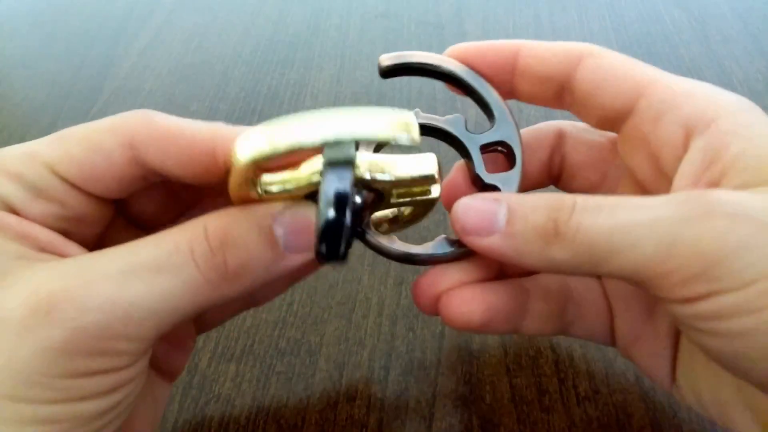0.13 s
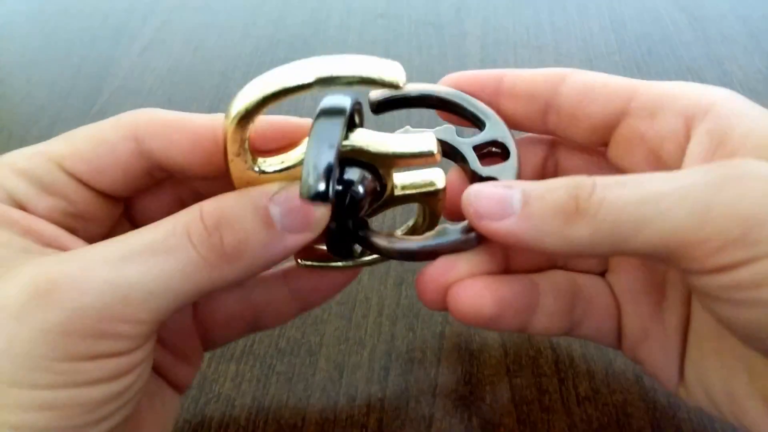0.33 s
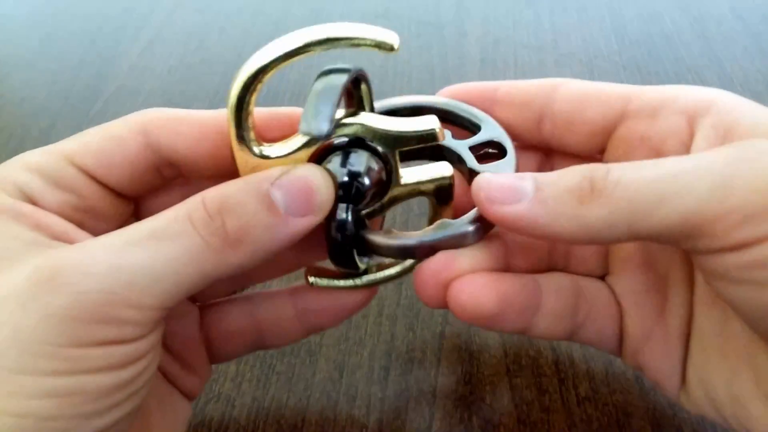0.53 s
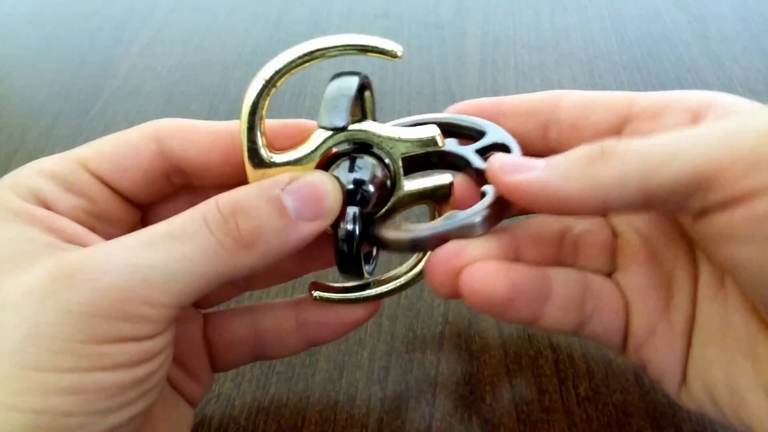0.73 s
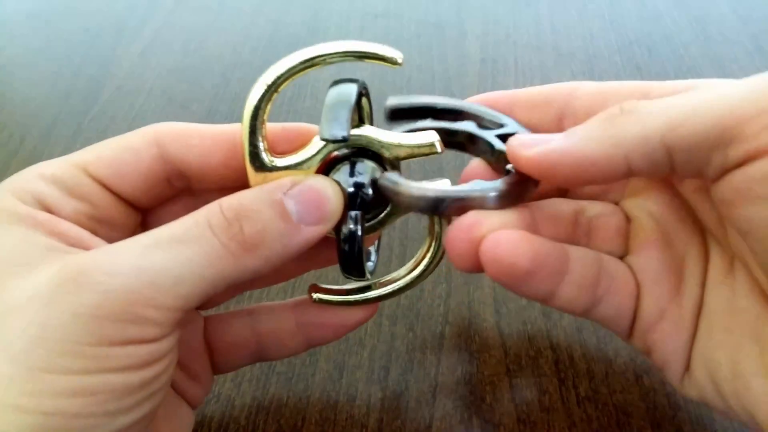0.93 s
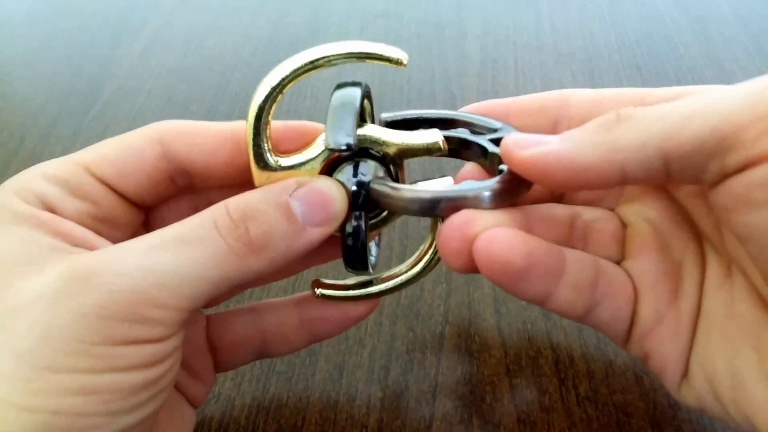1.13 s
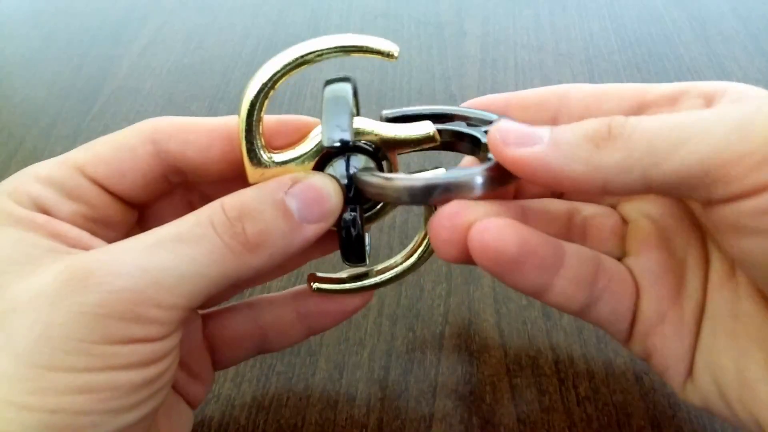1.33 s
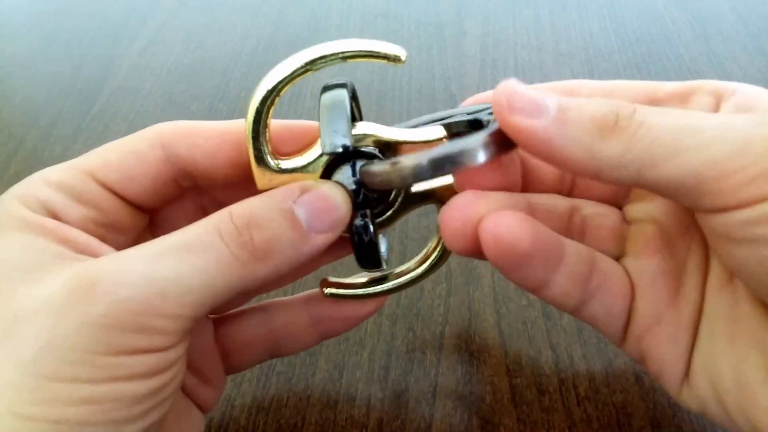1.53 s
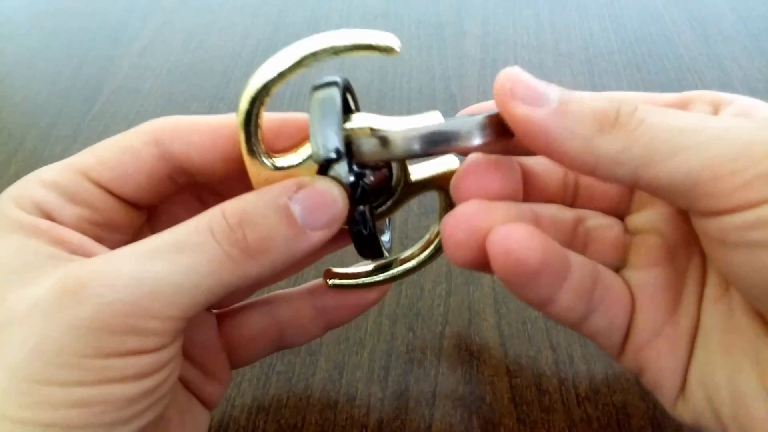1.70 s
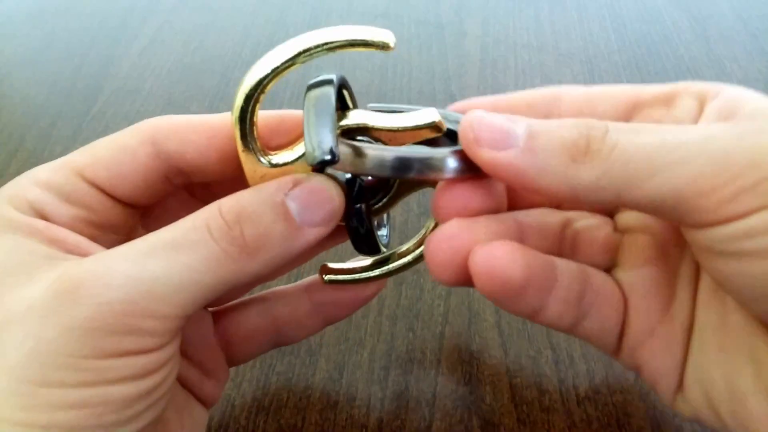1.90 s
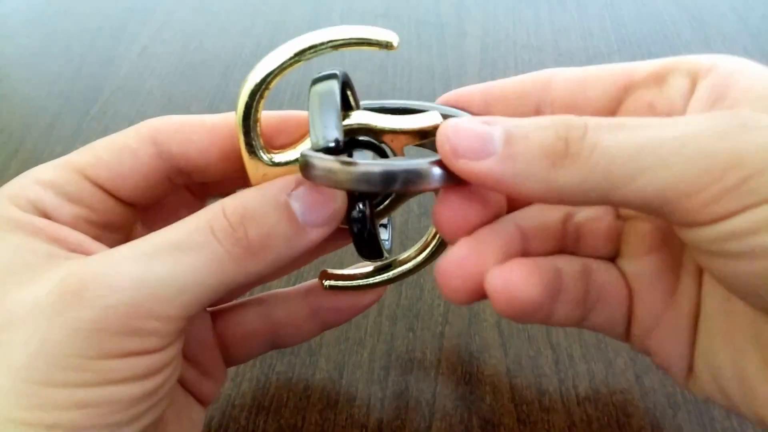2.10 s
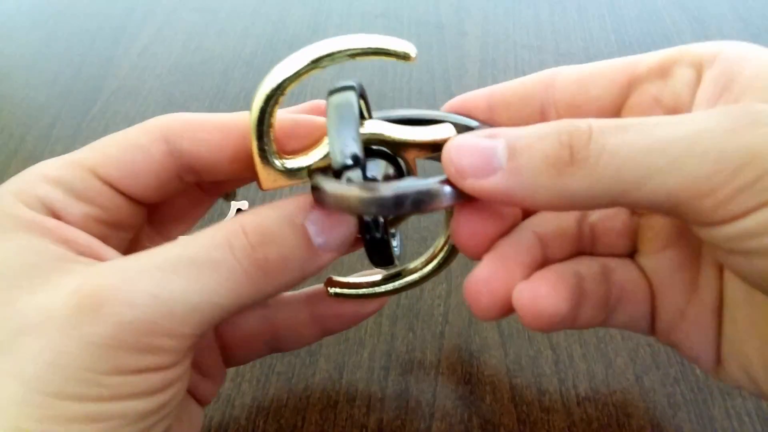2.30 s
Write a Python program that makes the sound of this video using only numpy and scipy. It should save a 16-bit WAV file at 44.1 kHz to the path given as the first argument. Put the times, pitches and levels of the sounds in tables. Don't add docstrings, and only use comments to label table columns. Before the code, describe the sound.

Small heavy metal pieces knock together in three bursts: a dense loud clatter first, then a group of sharp clinks, then a few sparser knocks; short choked rings, fine scraping, close stereo microphones in a quiet room.

```python
import sys
import numpy as np
from scipy import signal
from scipy.fft import rfft, irfft
from scipy.io import wavfile
from scipy.ndimage import uniform_filter1d

SR = 44100
rng = np.random.default_rng(int(sys.argv[2]) if len(sys.argv) > 2 else 0)


def to_wav(sig):
    pcm = np.clip(np.atleast_2d(sig), -1, 1) * 32767
    pcm = np.round(pcm).astype(np.int16)
    wavfile.write(sys.argv[1], SR, pcm.T)


def field_ratio(decibels):
    return 10 ** (np.asarray(decibels, dtype=float) / 20)


N = 103635


def evened(x):
    return x / np.sqrt(np.mean(x ** 2) + 1e-20)


def read(points, hz):
    f, value = np.transpose(points)
    return np.interp(np.log(hz + 1), np.log(f + 1), value)


def add(mix, start_s, sound):
    part = mix[:, round(start_s * SR):][:, :sound.shape[1]]
    part += sound[:, :part.shape[1]]


def panned(left_minus_right_db):
    return field_ratio([[left_minus_right_db / 2], [-left_minus_right_db / 2]])


def resonate(x, hz, width_hz):
    turn = np.exp(2j * np.pi * hz * np.arange(x.shape[-1]) / SR)
    r = np.exp(-np.pi * width_hz / SR)
    return 2 * (turn * signal.lfilter([1 - r], [1, -r], x / turn)).real


# pitch_hz, level_db
CRACK_COLOUR = [(500, -45.5), (1000, -29), (2000, -13.5), (4000, -6), (6500, 0.5), (9000, 6), (13000, -7),
                (16000, -23.5)]
# pitch_hz, width_hz, lift_db
HAND_HOLLOW = [(1050, 300, 11.5), (2450, 450, 6), (3800, 430, -1.5), (5040, 730, 5), (6790, 200, -4)]


def crack(noise, rise_ms, body_db=0):
    level_db, pan_db, lumps_db = -16.5, -1, 5
    body_hz, clatter_db, clatter_s = 6400, -12.5, 0.024
    t = np.arange(noise.shape[-1]) / SR
    hz = np.fft.rfftfreq(noise.shape[-1], 1 / SR)
    colour_db = read(CRACK_COLOUR, hz)
    colour_db += lumps_db * evened(uniform_filter1d(noise[2, :len(hz)], size=5))
    colour_db += sum(lift / (1 + (2 * (hz - f) / width) ** 2) for f, width, lift in HAND_HOLLOW)
    colour_db += body_db / (1 + (hz / body_hz) ** 6)
    bright = irfft(rfft(noise[:2]) * field_ratio(colour_db))
    u = t / (max(rise_ms, .1) / 1000)
    puff = u * np.exp(1 - u)
    clatter = field_ratio(clatter_db) * np.minimum(u, 1) * np.exp(-t / clatter_s)
    return evened(bright) * field_ratio(level_db) * (puff + clatter) * panned(pan_db)


# start_s, level_db, rise_ms, left_minus_right_db, body_lift_db
FIRST_TURN = [(.0074, -38.5, 2, 1.5, 1), (.0135, -51, 1.5, 2.5, 8), (0.1, -28.5, 1.8, -0.5, -3),
              (0.108, -47.5, 2, 2.5, 7.5), (0.1813, -32.5, 1.2, 14.5, 2), (0.1888, -25.5, 1.7, 13.5, 5.5),
              (0.2096, -28, 2.5, -3, 1), (0.2188, -6, .8, 11, -4.5), (0.2211, -7, 1.2, 4.5, -10.5),
              (.2252, -4, 0.6, 6, -7.5), (0.228, -7.5, 0.9, 4.5, -6.5), (0.2338, -14, 2, 2, -7.5),
              (.2425, -19.5, .6, 3, -7), (.2465, -24.5, 1, 3, -4.5), (.2555, -23, .8, 4.5, -8.5),
              (0.2633, -21.5, 1.4, 7.5, -8.5), (.3051, -25.5, 2, 22, -3), (.3135, -16.5, .5, 3.5, -2),
              (0.3147, -21, 1, -20, -9), (0.335, -23, 1.6, 5, -10.5), (0.4433, -26.5, 1.83, 0.5, -2.5),
              (0.4569, -29, 1.26, 7.5, 9.5)]
SECOND_TURN = [(.9235, -26.5, 0.35, 0, -2), (.9305, -36, 1, 4.5, 11.5), (.9374, -42, 1, 4, 4),
               (.9615, -58, 0.92, -7, 4), (.9765, -57, 1.2, -18, -1.5), (1.082, -44, 15, -19, 4),
               (1.1005, -9.5, 0.6, 8, -1), (1.1065, -22.5, .6, 2, 14.5), (1.112, -15, 1, 1.5, 10),
               (1.1362, -21, .6, 16, 14), (1.139, -15, 1.2, -11, 5.5), (1.1422, -10, 0.78, 7.5, 1.5),
               (1.1458, -5.5, 0.89, 3.5, -7), (1.2034, -15, 0.47, -1, -10), (1.307, -16, 1.09, -2, 4),
               (1.3115, -29.5, 1.94, -10, 11.5)]
THIRD_TURN = [
    (1.8236, -21.5, 0.82, 2, -2),
    (1.9355, -40.5, 2.2, 5, 11),
    (1.9511, -23, 3.7, 7, 10.5),
    (1.9851, -10.5, 2.06, 1, -1),
    (2.1296, -19, 0.39, 4.5, 5),
    (2.2333, -34.5, 1.6, -0.5, 7.5),
    (2.2702, -33, 1.6, 6.5, 19.5),
    (2.2807, -27, 0.25, 0, 0),
]


def knocks():
    out = np.zeros((2, N))
    rows = FIRST_TURN + SECOND_TURN + THIRD_TURN
    draws = rng.standard_normal((len(rows), 3, 2048))
    for (start_s, level_db, rise_ms, pan_db, body_db), draw in zip(rows, draws):
        add(out, start_s, field_ratio(level_db) * panned(pan_db) * crack(draw, rise_ms, body_db))
    return out


def ring(hz, db, t60, draw):
    wobble_db, wobble_per_s, rise_s, pan_db = 3, 45, .0006, 3
    hz, db, t60 = np.array([hz, db, t60], float).reshape(3, -1, 1, 1)
    t = np.arange(SR // 4) / SR
    phase = draw.reshape(-1, 2, 1)
    rate = wobble_per_s * (1 + np.tanh(phase) / 2)
    level_db = db + wobble_db * np.sin(2 * np.pi * rate * t) - 60 * t / t60
    waves = field_ratio(level_db) * np.sin(2 * np.pi * (hz * t + phase))
    return waves.sum(0) * np.minimum(t / rise_s, 1) * panned(pan_db)


TOUCHES = [
    .345,
    .52,
    0.9315,
    1.124,
    1.276,
    2.183,
    2.2785,
]


def choked(start_s, sound):
    choke_db, choke_s = -14, .004
    t = start_s + np.arange(sound.shape[1]) / SR
    return sound * field_ratio(sum(choke_db * np.clip((t - at) / choke_s, 0, 1) for at in TOUCHES if at > start_s))


RING_FACE_HZ = [4393, 5250, 10540, 11675, 14385]
RING_EDGE_HZ = [4440, 5570, 9190, 10570, 11680]
HOOK_BODY_HZ = [4945, 9268, 11670, 12690, 13330]
HOOK_TIP_HZ = [9450, 12720, 13740, 14540, 14400]
WHEEL_HUB_HZ = [1300, 3510, 3750, 7535, 13740]
WHEEL_RIM_HZ = [4465, 5385, 5955, 7900, 10900]
# level_db, t60_s
RING_FACE = [(-12, 0.12), (-21, 0.096), (-16, 0.17), (-12, 0.18), (-16, 0.064)]
RING_EDGE = [(-7, .05), (-4.5, 0.099), (-13, 0.12), (-23, 0.14), (-15.5, 0.04)]
HOOK_BODY = [(-15.5, 0.42), (-9, 0.16), (-17.5, 0.017), (-15, 0.087), (-21.5, 0.085)]
HOOK_TIP = [(-22, 0.14), (-17.5, 0.1), (-10.5, 0.065), (-1, 0.045), (-9.5, 0.05)]
WHEEL_HUB = [(-34, 0.014), (-8.5, 0.12), (-16, 0.12), (-11, 0.098), (-11.5, 0.08)]
WHEEL_RIM = [(-13.5, 0.12), (-4.5, 0.063), (-16.5, 0.16), (-11, 0.12), (-13, 0.051)]
# start_s, level_db, free_share (of the ring time, left by the fingers)
RING_FACE_HITS = [(0.4577, -24, 0.89), (1.105, -21.5, 2.1), (1.825, -39.5, 1.44), (1.989, -62, 1.1),
                  (2.1285, -33, 0.79)]
RING_EDGE_HITS = [(0.9773, -49, 2.3), (1.1317, -25.5, 0.7), (1.1456, -26, 2.97), (1.312, -29, 0.64),
                  (1.8223, -50.5, 0.84), (2.134, -41.5, 2.4)]
HOOK_BODY_HITS = [(.0078, -53.5, 1.4), (.1012, -45.5, 1.1), (.2215, -27.5, 0.72), (.924, -36.5, 0.21),
                  (.9376, -47, 1.6), (1.1015, -31.5, 0.53), (1.1535, -28, 0.43), (1.953, -19.5, 0.18),
                  (2.13, -35.5, 0.99)]
HOOK_TIP_HITS = [(0.188, -41, 0.41), (0.2242, -17, 1), (.4445, -43, 0.33), (1.137, -17.5, 1),
                 (1.3138, -50, 0.59), (1.9524, -48, 0.43), (2.128, -77, 0.87)]
WHEEL_HUB_HITS = [
    (1.9875, -27, 1.06),
    (2.236, -42, 0.63),
    (2.279, -51, 0.73),
]
WHEEL_RIM_HITS = [(0.3174, -37.5, 0.27), (1.8257, -47.5, 1), (1.952, -34, 0.96), (1.988, -28, 0.51),
                  (2.267, -50.5, 0.35), (2.2807, -40.5, 0.59)]
# start_s, pitch_hz, level_db, t60_s
PINGS = [(.012, 2530, -71, 0.072), (.013, 5040, -56, 0.077), (.101, 5650, -64, 0.15),
         (.106, 2615, -64, 0.11), (.19, 2760, -39.5, 0.035), (.2305, 9030, -41, 0.14),
         (.2305, 9448, -40.5, 0.45), (.2305, 8742, -38.5, .15), (.2305, 12500, -36.5, 0.18),
         (.315, 8300, -41, 0.038), (0.318, 1753, -52, 0.35), (.978, 2442, -55.5, 0.15),
         (.98, 1050, -71.5, 0.14), (1.101, 2578, -45.5, 0.18), (1.102, 9168, -53.5, 0.12),
         (1.102, 6207, -31.5, 0.15), (1.103, 4393, -30, 0.3), (1.137, 2500, -47.5, 0.16),
         (1.148, 9288, -31, 0.1), (1.148, 8600, -47.5, 0.038), (1.31, 5150, -50, 0.068),
         (2.131, 1088, -66, 0.34), (0.46, 1740, -68, 0.21), (2.2335, 1286, -56.5, 0.035),
         (2.238, 1783, -61.5, 0.57), (2.281, 7580, -36.5, 0.079), (2.281, 8040, -36, 0.066)]


def rings():
    mode_spread_db = 1.5
    out = np.zeros((2, N))
    families = [(RING_FACE_HZ, RING_FACE, RING_FACE_HITS), (RING_EDGE_HZ, RING_EDGE, RING_EDGE_HITS),
                (HOOK_BODY_HZ, HOOK_BODY, HOOK_BODY_HITS), (HOOK_TIP_HZ, HOOK_TIP, HOOK_TIP_HITS),
                (WHEEL_HUB_HZ, WHEEL_HUB, WHEEL_HUB_HITS), (WHEEL_RIM_HZ, WHEEL_RIM, WHEEL_RIM_HITS)]
    for hz, modes, hits in families:
        mode_db, t60 = np.transpose(modes)
        draws = rng.standard_normal((len(hits), 3, len(hz)))
        for (start_s, level_db, free_share), draw in zip(hits, draws):
            strike_db = level_db + mode_db + mode_spread_db * draw[0]
            add(out, start_s, choked(start_s, ring(hz, strike_db, free_share * t60, draw[1:])))
    for (start_s, hz, level_db, t60), draw in zip(PINGS, rng.random((len(PINGS), 2))):
        add(out, start_s, choked(start_s, ring(hz, level_db, t60, draw)))
    return out


# start_s, length_s, level_db, fade_db (change by the end)
SCRAPES = [
    (0.182, .03, -42.5, -8),
    (0.21, 0.16, -40.5, -10.5),
    (0.464, 0.22, -67, -14),
    (0.936, 0.055, -57, 0),
    (1.123, 0.07, -39.5, -6),
    (1.943, 0.0046, -71, 15),
    (1.962, 0.014, -42.5, -11),
]


def scrapes():
    ticks_per_s, spread_db, rise_ms, kinds = 2300, 5, 2, 12
    t = np.arange(N) / SR
    level = np.zeros(N)
    for start_s, length_s, level_db, fade_db in SCRAPES:
        sliding = (t > start_s) & (t < start_s + length_s)
        level += sliding * field_ratio(level_db + fade_db * np.clip((t - start_s) / length_s, 0, 1))
    size = field_ratio(spread_db * np.minimum(rng.exponential(1, N), 3))
    ticks = level * size * (rng.random(N) < ticks_per_s / SR)
    kind = rng.integers(0, kinds, N)
    out = np.zeros((2, N))
    for k in range(kinds):
        tick = crack(rng.standard_normal((3, 1024)), rise_ms)
        out += signal.oaconvolve((ticks * (kind == k))[None], tick, axes=1)[:, :N]
    return out


# pitch_hz, t60_s
ROOM_DECAY = [(500, 1), (2000, 0.62), (5000, 0.49), (9000, 0.32), (16000, 0.64)]


def room(x):
    level_db, delay_s = -9.5, 0.012
    hz, t, z = signal.stft(rng.standard_normal((2, SR)), SR, nperseg=256)
    decay = field_ratio(-60 * t / read(ROOM_DECAY, hz)[:, None])
    tail = signal.istft(z * decay, SR, nperseg=256)[1]
    tail *= np.arange(tail.shape[1]) > delay_s * SR
    return field_ratio(level_db) * signal.fftconvolve(x, tail / np.linalg.norm(tail[0]), axes=1)[:, :N]


# pitch_hz, width_hz, lift_db
PORTS = [(9401, 210, 18.5), (8850, 250, 6.5)]


def ports(x):
    low_cut_hz, top_hz, shadow_hz = 600, 14880, 11000
    dip_hz, dip_width_hz, dip_share = 11200, 1500, .75
    band = signal.butter(4, [low_cut_hz, top_hz], "band", fs=SR, output="sos")
    left, right = signal.sosfilt(band, x)
    right = signal.lfilter(*signal.butter(2, shadow_hz, fs=SR), right)
    right = right - dip_share * resonate(right, dip_hz, dip_width_hz)
    return np.array([ch + (field_ratio(lift_db) - 1) * resonate(ch, hz, width_hz)
                     for ch, (hz, width_hz, lift_db) in zip([left, right], PORTS)])


def gate_lift_db(near):
    open_at_db, most_db, close_db_per_s, duck_at_db = -34.5, 15.5, 40.5, -26
    power = uniform_filter1d((near ** 2).mean(0), 1024)[::256]
    loud_db = 10 * np.log10(abs(power) + 1e-12)
    fall = np.arange(len(loud_db)) * 256 / SR * close_db_per_s
    opened = np.clip(loud_db - open_at_db + most_db, 0, most_db)
    lift_db = np.maximum(np.maximum.accumulate(opened + fall) - fall, 0)
    lift_db = lift_db - np.maximum(loud_db - duck_at_db, 0)
    return uniform_filter1d(np.pad(lift_db, (0, 5), "edge"), size=7, origin=3)


# pitch_hz, level_db (per Hz)
HUSH_COLOUR = [(15, -38), (25, -6.5), (170, -7.5), (212, -8.5), (363, -14.5), (416, -15.5), (1610, -21.5),
               (2110, -22), (16000, -18)]


def hush(near):
    level_db, pan_db, same = -77.5, 2.5, 0.1
    gate_low_hz, top_hz = 2604, 15600
    lift_db = gate_lift_db(near)
    hz = np.fft.rfftfreq(1024, 1 / SR)[:, None]
    a, b, c, d = rng.standard_normal((len(lift_db), 513, 4)).T
    left = a + 1j * b
    right = same * left + np.sqrt(1 - same ** 2) * (c + 1j * d)
    z = np.array([left, right]) * field_ratio(read(HUSH_COLOUR, hz))
    z /= 1 + (hz / top_hz) ** 12
    gate = field_ratio(lift_db / (1 + (hz / gate_low_hz) ** 2))
    shut = signal.istft(z, nperseg=1024, noverlap=768)[1]
    out = signal.istft(z * gate, nperseg=1024, noverlap=768)[1]
    return field_ratio(level_db) * panned(pan_db) * out[:, :N] / shut.std()


# centre_s, half_length_s, level_db
RUMBLE_SWELLS = [
    (1.128, .02, -74.5),
    (1.453, 0.052, -71.5),
    (1.655, 0.1, -64),
    (2.102, 0.11, -61),
    (2.32, 0.065, -62),
]
# pitch_hz, width_hz, level_db
RUMBLE_BODY = [(180, 40, 0), (236, 32, 2), (385, 45, -6.5)]


def rumble():
    pan_db, side_db, flutter_db = 3.5, -10.5, -1
    t = np.arange(N) / SR
    level = sum(field_ratio(db) * np.exp(-((t - centre_s) / half_s) ** 2) for centre_s, half_s, db in RUMBLE_SWELLS)
    mid, side = rng.standard_normal((2, N))
    drive = np.array([mid + field_ratio(side_db) * side, mid - field_ratio(side_db) * side])
    body = sum(field_ratio(db) * resonate(resonate(drive, hz, width), hz, 2 * width) for hz, width, db in RUMBLE_BODY)
    slow = uniform_filter1d(uniform_filter1d(mid * side, size=600), size=600)
    return evened(body * field_ratio(flutter_db * evened(slow))) * panned(pan_db) * level


def scene():
    ring_room_db = -12
    rough = knocks() + scrapes()
    tones = rings()
    near = ports(rough + tones + room(rough + field_ratio(ring_room_db) * tones))
    return near + hush(near) + rumble()


def low_pass(x):
    return signal.sosfilt(signal.butter(12, 16460, fs=SR, output="sos"), x)


def record(dry):
    edge_hz = 16420
    limited = signal.oaconvolve(dry, signal.firwin(127, edge_hz, fs=SR)[None], "same")
    return low_pass(limited)


dry = scene()
out = record(dry)
to_wav(out)
```